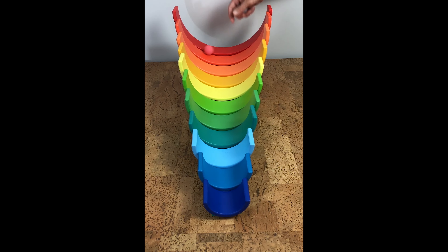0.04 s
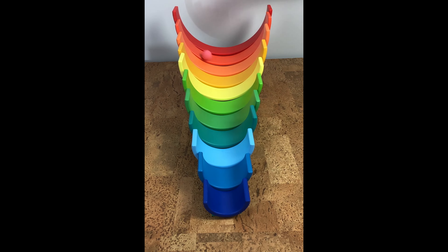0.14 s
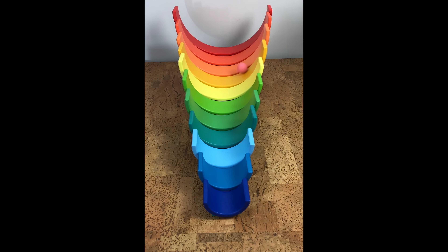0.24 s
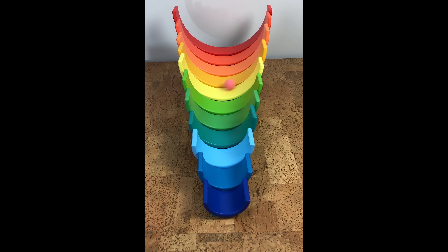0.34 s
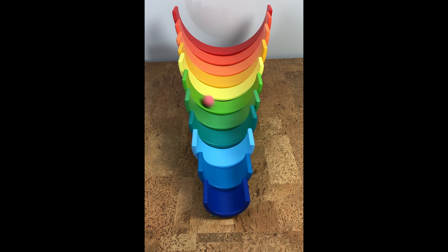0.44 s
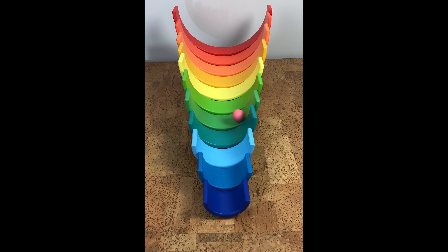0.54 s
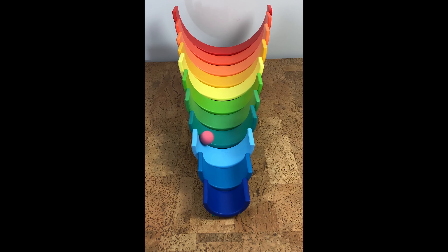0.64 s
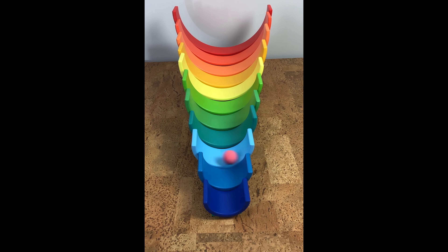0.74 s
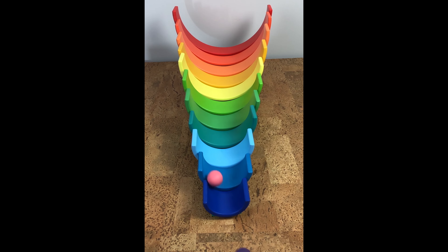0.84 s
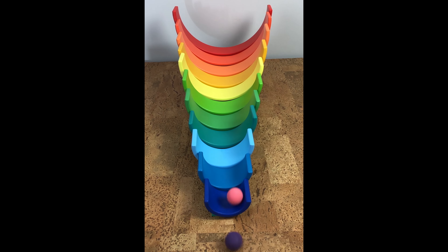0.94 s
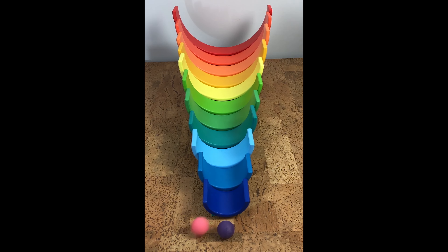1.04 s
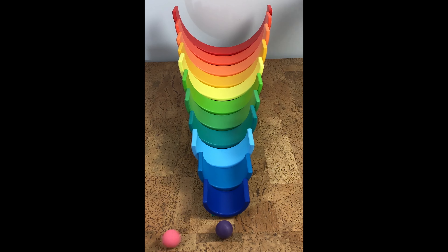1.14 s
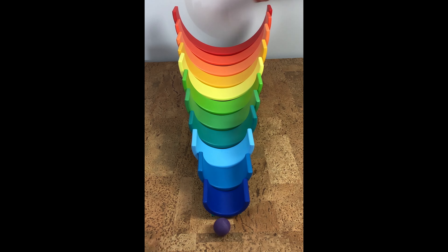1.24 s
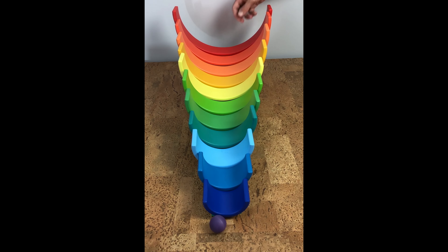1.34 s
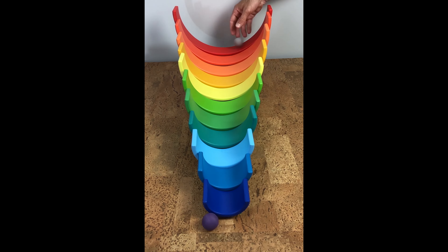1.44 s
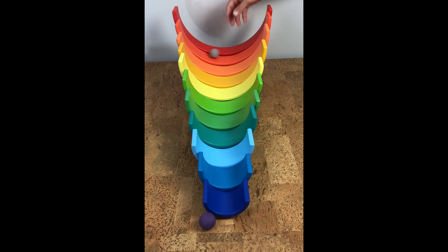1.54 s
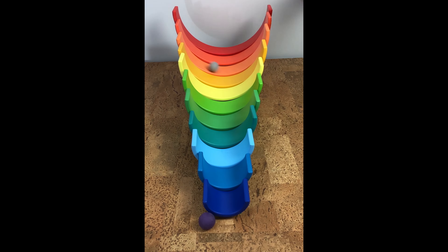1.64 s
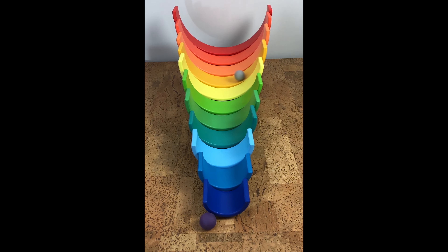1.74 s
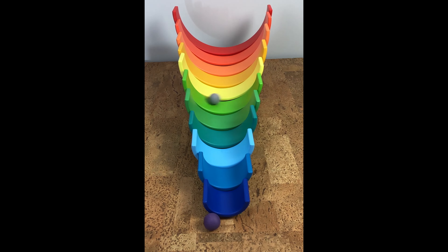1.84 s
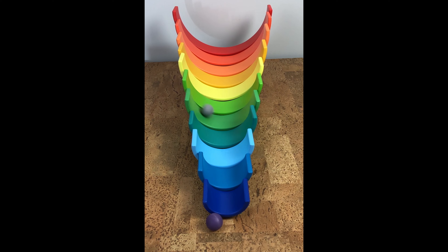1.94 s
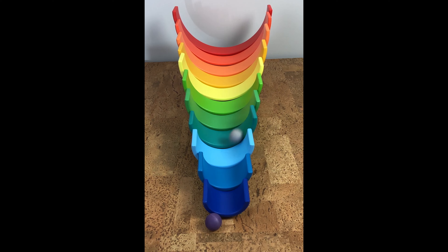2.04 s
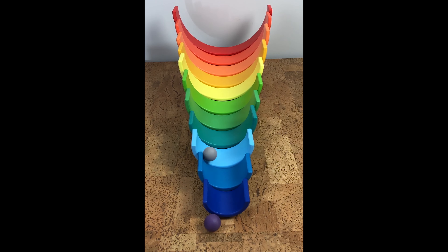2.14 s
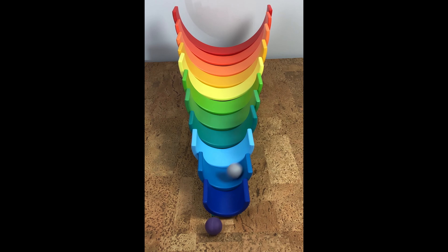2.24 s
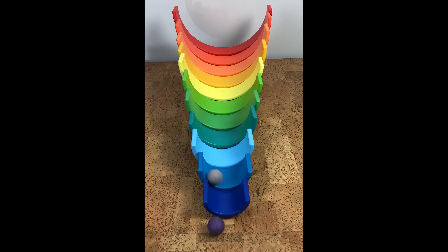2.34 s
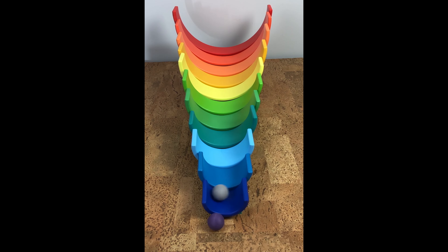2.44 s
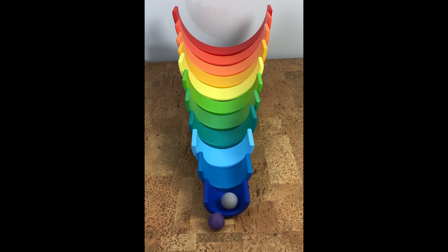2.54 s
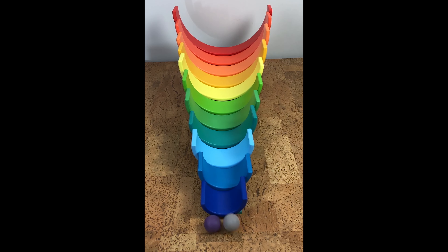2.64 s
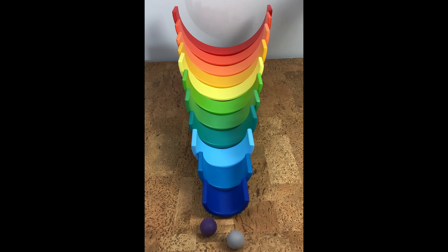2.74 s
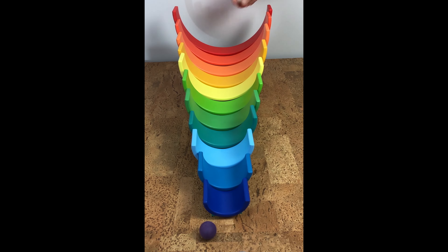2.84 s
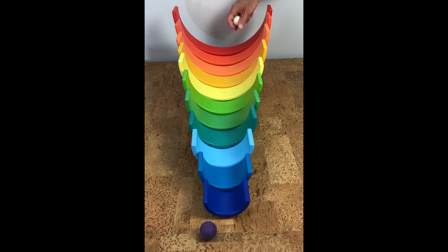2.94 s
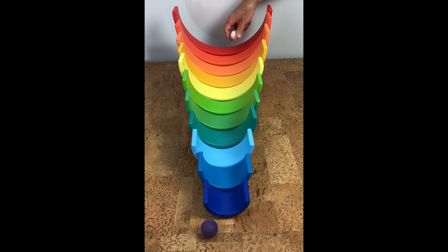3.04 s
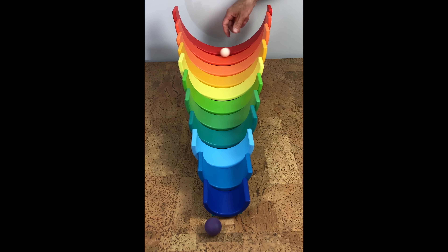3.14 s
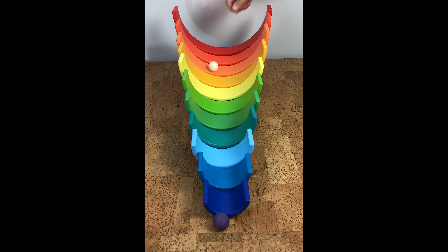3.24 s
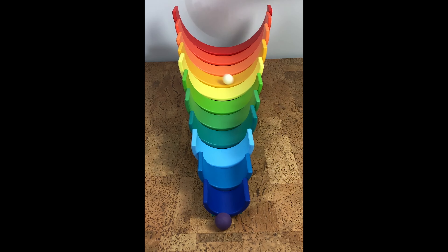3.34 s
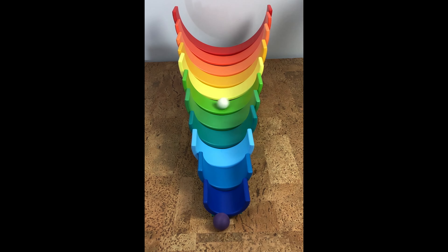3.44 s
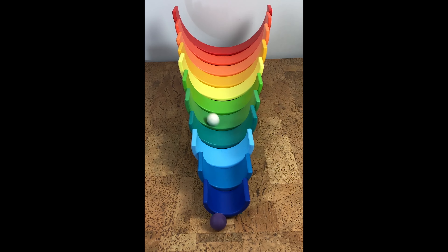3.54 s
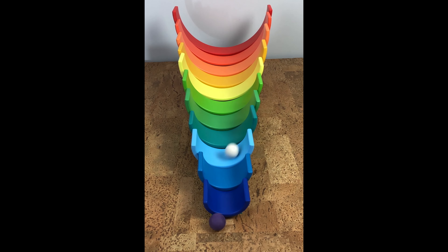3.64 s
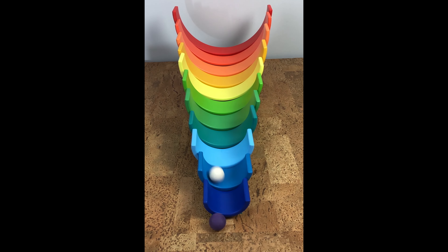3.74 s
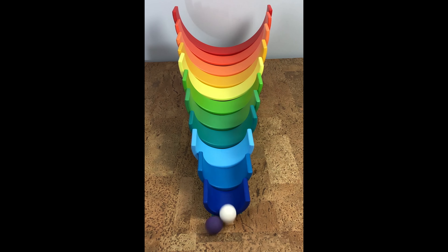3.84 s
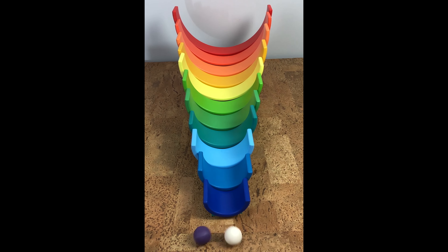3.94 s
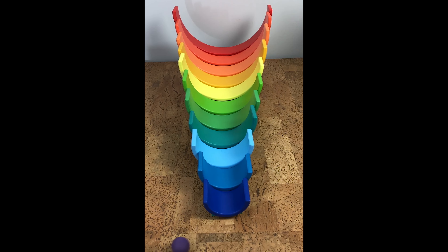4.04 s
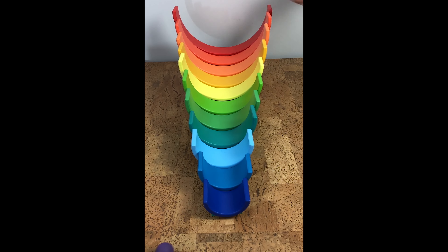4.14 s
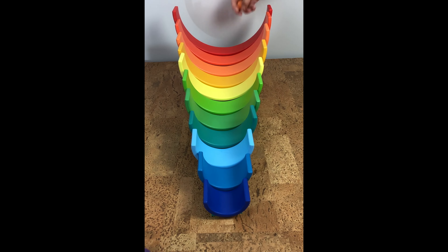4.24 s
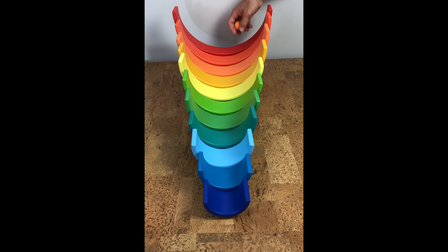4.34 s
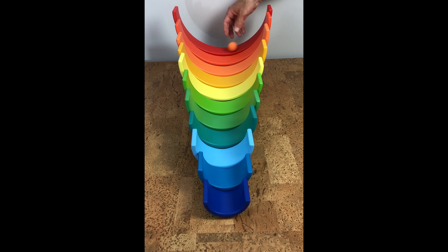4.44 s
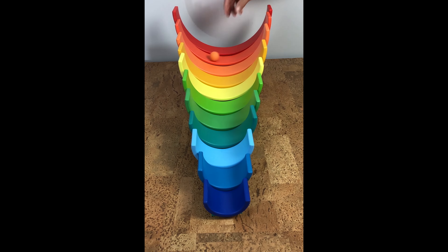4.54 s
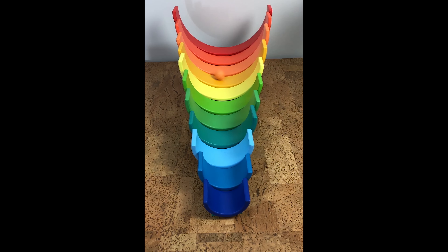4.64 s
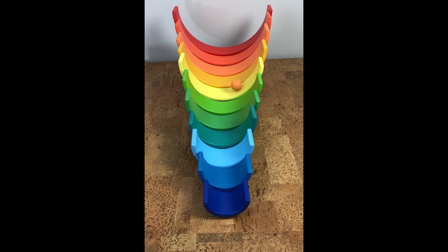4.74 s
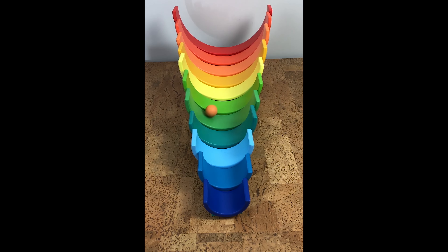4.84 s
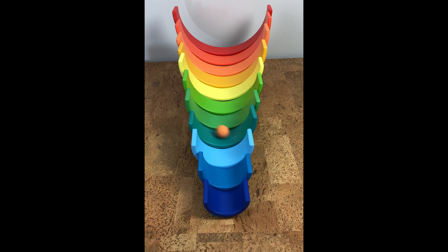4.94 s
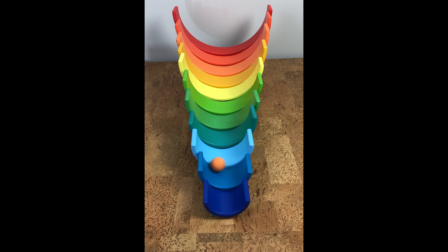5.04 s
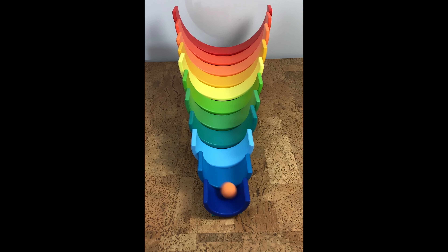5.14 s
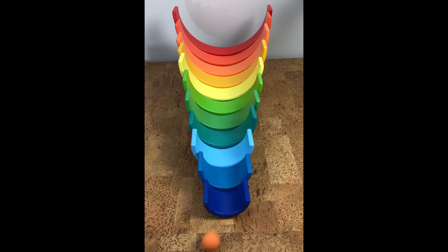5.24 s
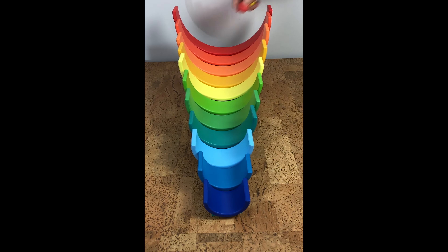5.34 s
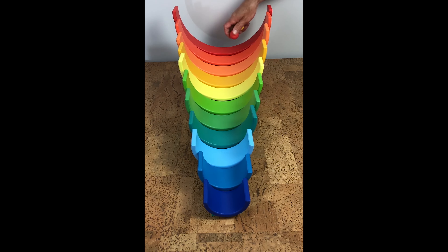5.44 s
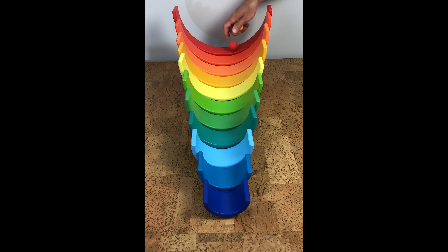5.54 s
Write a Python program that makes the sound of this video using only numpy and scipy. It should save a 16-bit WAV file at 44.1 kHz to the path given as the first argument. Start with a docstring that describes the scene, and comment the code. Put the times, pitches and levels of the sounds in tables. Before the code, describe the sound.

Four quick runs of dry wooden knocking, with short near-silent gaps between them, and the first knock of a fifth. The knocks come roughly every seventh of a second or faster, loudest near the top, with a sharp clatter in the second and third runs. Soft low thumps on cork and small ball clicks end the runs. Close, mono, small quiet room.

```python
"""Wooden balls on a staircase of arches

Small wooden balls are let go one after another at the top of a staircase of nested wooden arches. Each knocks
on arch after arch over a bed of rolling; four bounce on cork, the first three also click against another
ball, and the fifth only starts. A blow is a noise cloud of dense resonances plus sine modes; rolling is many
tiny contacts, rumble and air are coloured noise. A quiet, fairly dry room adds a faint decaying tail."""
import sys
import numpy as np
from scipy import signal
from scipy.fft import rfft, irfft, next_fast_len
from scipy.io import wavfile

SR = 44100
rng = np.random.default_rng(int(sys.argv[2]) if len(sys.argv) > 2 else 0)


def bounce(signal):
    """Save signal as a 16-bit WAV file at the path given by the first command-line argument."""
    frames = np.transpose(np.atleast_2d(signal))
    limited = np.clip(frames, -1, 1)
    pcm = np.round(limited * 32767).astype(np.int16)
    wavfile.write(sys.argv[1], SR, pcm)


N = 246519  # samples

# A ball lands on an arch: [t/s, spot (0-12 down the stack, 13 a hard rim, 14 a loose joint),
# strength level/dB, contact hardness level/dB, jolt to the stack level/dB]
ARCH_IMPACTS = [(0.006, 0, -27.5, -22, -4.5), (0.06, 14, -36, -3.5, 8.5), (0.172, 3, -33.5, -2, -2.5),
                (0.259, 4, -37, 0, 2), (0.344, 5, -35, 3, -4.5), (0.417, 6, -35.5, -4, -1),
                (0.505, 7, -32.5, -4.5, -6.5), (0.563, 8, -44, -19, 4), (0.622, 10, -52.5, -22, 1.5),
                (0.671, 9, -38, 1, -1), (0.768, 10, -38.5, 4, 1), (0.859, 11.5, -44, 4.5, -7.5),
                (0.897, 11, -46.5, -0.5, 0.5), (1.394, 0, -26, -11, -3.5), (1.465, 1, -26.5, 8.5, -0.5),
                (1.529, 2, -32, -3, -1.5), (1.618, 3, -35, 3, 1.5), (1.689, 4.5, -30, 10.5, 7),
                (1.703, 8, -34.5, 5.5, 9.5), (1.77, 12, -45.5, -7, 3), (1.807, 14, -25, -8, 5.5),
                (1.858, 4, -30.5, -3, 2), (1.931, 7, -39, -2, 3), (2.011, 8.5, -34, 4.5, 4),
                (2.088, 9.5, -36.5, -5, 3), (2.139, 10, -35.5, 7.5, -5), (2.234, 10.5, -40, -7.5, -2),
                (2.408, 12, -38, 2, -4.5), (2.438, 12, -56, 13, 2), (2.552, 12, -49.5, 7, 8.5),
                (3.101, 1, -29, 8.5, 2.5), (3.129, 1, -39, 4, 4), (3.152, 2, -32, -1.5, -2.5),
                (3.231, 3, -33.5, -1.5, 1.5), (3.305, 4, -37, -5.5, 6), (3.373, 5, -32, -0.5, -4),
                (3.445, 6, -30, -8.5, -2), (3.462, 5, -36.5, -11.5, 0.5), (3.503, 6.5, -39.5, -7, -4.5),
                (3.515, 13, -32, 22.5, 12.5), (3.525, 13.5, -34.5, 21, 15), (3.576, 8, -32, 6.5, 5),
                (3.641, 9, -34, 3, -1), (3.713, 10, -34, 3.5, 5), (3.79, 11.5, -29, 6, 2.5),
                (4.444, 1, -29.5, 11, 0), (4.509, 2, -33, -10, -4.5), (4.585, 3, -30.5, 0.5, -2),
                (4.66, 4, -35.5, -5.5, 5), (4.73, 5, -34.5, 1, -1), (4.799, 6, -32, -8.5, 0.5),
                (4.814, 6, -35.5, -8.5, -5), (4.867, 7, -30.5, 1, -1), (4.935, 8, -31.5, -2.5, -2.5),
                (5.001, 9, -37.5, 3.5, -4), (5.075, 10.5, -27, 1, -2), (5.151, 11.5, -30, 5, 0.5),
                (5.533, 1, -29.5, 7, 0)]
# Modes of the wood at each spot: [spot, f/Hz, relative level/dB, t60/s]
ARCH_MODES = [(0, 1378, -6, 0.12), (0, 1776, -9, 0.1), (0, 2271, -10, 0.12), (0, 2767, -11, 0.07),
              (1, 1555, -16, 0.18), (1, 2083, -17, 0.12), (1, 2643, -15, 0.1), (1, 2836, -7, 0.07),
              (1, 3289, -15, 0.08), (1, 4317, -13, 0.07), (2, 834, -13, 0.18), (2, 1248, -9, 0.14),
              (2, 1674, -13, 0.06), (2, 1851, -13, 0.08), (2, 1970, -16, 0.07), (2, 2379, -13, 0.1),
              (3, 915, -15, 0.18), (3, 1437, -13, 0.07), (3, 2314, -11, 0.09), (3, 4242, -17, 0.06),
              (4, 177, -14, 0.18), (4, 1281, -12, 0.09), (4, 2520, -9, 0.07), (4, 3560, -19, 0.06),
              (5, 1318, -12, 0.07), (5, 1426, -11, 0.16), (5, 2820, -9, 0.07), (6, 1038, -17, 0.16),
              (6, 1738, -5, 0.11), (7, 1426, -9, 0.13), (7, 1884, -14, 0.07), (7, 2282, -15, 0.14),
              (7, 3870, -16, 0.06), (8, 952, -17, 0.16), (8, 1846, -13, 0.14), (8, 2293, -15, 0.06),
              (8, 2772, -11, 0.06), (8, 3671, -13, 0.07), (9, 1200, -11, 0.09), (9, 1641, -16, 0.11),
              (9, 2470, -6, 0.08), (9, 3488, -16, 0.06), (10, 866, -11, 0.11), (10, 1590, -10, 0.06),
              (10, 1964, -13, 0.08), (11, 1022, -16, 0.18), (11, 1340, -12, 0.16), (11, 1900, -10, 0.09),
              (11, 2277, -13, 0.1), (12, 1415, -5, 0.09), (12, 1900, -14, 0.08), (12, 5512, -15, 0.06),
              (13, 1400, -8, 0.08), (13, 6018, -14, 0.07), (13, 6336, -12, 0.08), (13, 6454, -11, 0.08),
              (13, 6870, -16, 0.07), (13, 7321, -14, 0.08), (14, 770, -10, 0.1), (14, 1324, -5, 0.075),
              (14, 1604, -9, 0.078)]
# Preference of each spot for the clack register, indexed by spot: [level/dB]
SPOT_CLACK_DB = [3, 3.5, -0.5, 1.5, 2.5, 3.5, -2.5, -3, 2, 2.5, -2, -4, -6, -4.5, -4]
# Dense, overlapping resonances of struck wood: [f/Hz, level/dB]
WOOD_SPECTRUM = [(35, -39), (105, -11), (170, -6), (250, -2), (400, -3), (520, -5.5), (750, -2),
                 (1500, -0.5), (2800, -1), (4500, -4), (6500, -7), (10000, -17), (15000, -26)]
# A ball bounces on the cork: [t/s, strength level/dB, hardness level/dB, jolt to the surface level/dB]
CORK_IMPACTS = [(1.045, -32, -3.5, -9), (1.078, -37.5, 2.5, -4.5), (1.106, -44, -8, 3),
                (1.183, -51.5, 0.5, -3), (2.661, -36.5, 2.5, -3), (2.7, -43, 4, 2), (3.888, -39, 1, -1),
                (3.92, -44, 3.5, 2.5), (3.949, -50.5, -4, 1.5), (5.231, -37, 3, -2), (5.264, -39, -7, -8),
                (5.282, -41, -11, 0.5)]
# Modes of the surface under the cork: [f/Hz, relative level/dB, t60/s]
CORK_MODES = [(386, -14.5, .08), (807, -14, 0.052)]
# Dense, overlapping resonances of the cork surface: [f/Hz, level/dB]
CORK_SPECTRUM = [(30, -48.5), (70, -24), (246, -4.5), (938, -3.5), (1520, -7.5), (2260, -15.5), (4000, -25),
                 (5600, -23.5), (8000, -37), (15000, -44)]
# The ball clicks against one that lies at the foot: [t/s, strength level/dB]
BALL_CLICKS = [(1.015, -46.5), (2.517, -61.5), (2.627, -57), (3.849, -39.5)]
# Short, hollow spectrum of ball on ball: [f/Hz, level/dB]
CLICK_SPECTRUM = [(60, -29), (400, -14), (1500, -8), (2800, 2.5), (4400, -3.5), (6000, -21), (15000, -25)]
# Light touches along the lowest rim: [t/s, strength level/dB, hardness level/dB, ring f/Hz]
RIM_TOUCHES = [(2.459, -55, -3, 5700), (2.639, -47, -4.5, 6000), (2.703, -56, 0, 5761),
               (2.743, -53, -8.5, 5600), (2.783, -57.5, -1.5, 5470), (2.811, -59.5, -6, 5230),
               (2.84, -60, -3, 5400)]
# Broad resonances of a light touch: [f/Hz, level/dB]
TOUCH_SPECTRUM = [(40, -39), (200, -8), (1900, 15), (2600, 6), (3500, -4.5), (4700, -1), (5800, 3),
                  (7000, -15), (15000, -27)]
# Each ball's run down the stack: [start t/s, reaches the cork t/s, rolling level/dB, rumble level/dB,
# fine rattle level/dB at the end of the run]
RUNS = [(0, 0.94, -57, -59, -65.5), (1.4, 2.304, -52, -61, -67.5), (3.099, 3.81, -51, -64, -67.5),
        (4.44, 5.256, -55, -57.5, -73), (5.53, 5.8, -50, -55, -70)]
# Rolling grain of the wood: [f/Hz, level/dB]
GRAIN_SPECTRUM = [(150, -16), (450, -0.5), (900, 10.5), (1500, 6.5), (2400, -6), (4000, -26), (6000, -18.5),
                  (15000, -37.5)]
# Fine rattle of the ball skipping over the grain: [f/Hz, level/dB]
RATTLE_SPECTRUM = [(300, -29.5), (1500, -5.5), (2800, -2.5), (5500, -0.5), (8000, -14.5), (15000, -19)]
# Low rumble of the stack: [f/Hz, level/dB]
RUMBLE_SPECTRUM = [(30, -41), (70, -8), (105, -7.5), (140, -2.5), (190, -3.5), (250, 3.5), (380, -4.5),
                   (600, -10), (1500, -52)]
# Room air: [f/Hz, level/dB]
AIR_SPECTRUM = [(25, -8.5), (60, -0.5), (260, -0.5), (450, -15), (1000, -16.5), (3000, -25), (15000, -34)]
# Edges of the thud, knock, clack and tick registers: [f/Hz]
REGISTER_EDGES_HZ = [90, 600, 2400, 5200, 15000]
# Small pieces radiate little deep bass: [f/Hz, level/dB]
BASS_LOSS = [(30, -14), (70, -3.5), (130, 0)]
# Balance of a contact on wood, cork, ball and rim: [thud, knock, clack, tick level/dB]
ON_WOOD_DB = [-15, 0, -4.5, -16]
ON_CORK_DB = [-2, -1, -19, -25]
ON_BALL_DB = [-4, -3, -3, -23]
ON_RIM_DB = [-10, 2, -7, -2]

KNOCK_TIME = np.arange(16384) / SR - .03  # s, zero at the peak of a knock
KNOCK_SPAN_S = .02  # register levels are energy spread over this time
TOP_HZ = 15850
CLACK_SHARE = 0.51  # share of the hardness level that reaches the clack register
CLATTER_PER_JOLT = .35  # dB of clatter per dB of jolt
NEIGHBOUR_DB, NEIGHBOUR_T60_S = -20, .2
TOUCH_RING_DB, TOUCH_RING_T60_S = -14.5, 0.045
ROLL_ATTACK_S, ROLL_RELEASE_S, RATTLE_RELEASE_S = 0.067, 0.074, 0.035
RATTLE_GROWTH_DB_PER_S = 17
RUMBLE_ATTACK_S, RUMBLE_HOLD_S, RUMBLE_RELEASE_S = 0.023, 0.14, 0.3
AIR_DB = -66


def arches():
    """Modal excitation: each blow rings the struck arch, and coupling lets its neighbours ring along."""
    out = np.zeros(N)
    for s, position, strength_db, hardness_db, jolt_db in ARCH_IMPACTS:
        spot = round(position)
        modes = []
        for at, hz, db, t60 in ARCH_MODES:
            if at == spot:
                modes.append((hz, db, t60))
            elif abs(at - spot) == 1 and max(at, spot) < 13:
                modes.append((hz, db + NEIGHBOUR_DB, NEIGHBOUR_T60_S))
        # a heavy jolt shakes the whole stack, whose clatter covers the arch's own notes
        body_db = -4.5 + CLATTER_PER_JOLT * jolt_db
        levels_db = contact(ON_WOOD_DB, strength_db, hardness_db, jolt_db, SPOT_CLACK_DB[spot])
        blow = knock(WOOD_SPECTRUM, modes, levels_db, rise_s=0.0075, crack_t60=0.045,
                     tail_db=-6, tail_t60=0.2, body_db=body_db)
        add(out, s, blow)
    return out


def cork_bounces():
    """Soft impact: the ball bounces dully, since a yielding surface excites little treble."""
    out = np.zeros(N)
    for s, strength_db, hardness_db, jolt_db in CORK_IMPACTS:
        levels_db = contact(ON_CORK_DB, strength_db, hardness_db, jolt_db)
        blow = knock(CORK_SPECTRUM, CORK_MODES, levels_db, rise_s=0.0063, crack_t60=0.05,
                     tail_db=-3.0, tail_t60=0.12, body_db=0.5)
        add(out, s, blow)
    return out


def ball_clicks():
    """Collision of two small solids: a short, hollow click without separate modes."""
    out = np.zeros(N)
    for s, strength_db in BALL_CLICKS:
        blow = knock(CLICK_SPECTRUM, [], contact(ON_BALL_DB, strength_db), rise_s=.007, crack_t60=0.045,
                     tail_db=-11, tail_t60=0.16, body_db=0)
        add(out, s, blow)
    return out


def rim_touches():
    """Light contact excitation: the ball rattles along the lowest rim, each touch with one high mode."""
    out = np.zeros(N)
    for s, strength_db, hardness_db, hz in RIM_TOUCHES:
        modes = [(hz, TOUCH_RING_DB, TOUCH_RING_T60_S)]
        levels_db = contact(ON_RIM_DB, strength_db, hardness_db)
        blow = knock(TOUCH_SPECTRUM, modes, levels_db, rise_s=0.0055, crack_t60=0.051,
                     tail_db=-4, tail_t60=0.32, body_db=0.5)
        add(out, s, blow)
    return out


def soft_bump():
    """Damped oscillation: two decaying low sines make one soft bump as a ball rolls away."""
    out = np.zeros(N)
    low = np.sin(2 * np.pi * 62 * KNOCK_TIME) * swell(0.01, 0.09)
    upper = np.sin(2 * np.pi * 248 * KNOCK_TIME) * swell(0.0055, 0.086)
    add(out, 2.876, undb(-52.5) * (low + upper))
    return out


def rolling():
    """Rolling as a series of micro-impacts: the ball stumbles and skips over the grain of the wood."""
    t = np.arange(N) / SR
    roll, rattle = np.zeros((2, N))
    for start, end, roll_db, _, rattle_db in RUNS:
        roll += undb(roll_db) * gate(start, end, ROLL_ATTACK_S, ROLL_RELEASE_S)
        # the rattle grows as the ball nears the lowest arch
        growth_db = -RATTLE_GROWTH_DB_PER_S * np.maximum(end - t, 0)
        rattle += undb(rattle_db + growth_db) * gate(start, end, ROLL_ATTACK_S, RATTLE_RELEASE_S)
    contacts = np.zeros(N)
    for at in np.linspace(0, N / SR, 300):
        tap = unit(ring(spacing_hz=130, depth_db=5) * swell(.006, .12))
        add(contacts, at + KNOCK_SPAN_S * rng.random(), undb(rng.uniform(-11, 0)) * tap)
    grain = colour(contacts, GRAIN_SPECTRUM)
    fine = colour(contacts, RATTLE_SPECTRUM)
    return roll * grain / grain.std() + rattle * fine / fine.std()


def stack_rumble():
    """Structure-borne sound: wavering low noise under each run, held on while the ball crosses the cork."""
    level = np.zeros(N)
    for start, end, _, rumble_db, _ in RUNS:
        level += undb(rumble_db) * gate(start, end + RUMBLE_HOLD_S, RUMBLE_ATTACK_S, RUMBLE_RELEASE_S)
    return level * noise(RUMBLE_SPECTRUM) * undb(0.9 * walk(25, size=N))


def room(x, t60, gain_db):
    """Reverberation: convolution with exponentially decaying noise gives a faint, dull tail from the walls."""
    t = np.arange(SR // 2) / SR
    decay = np.exp(-np.log(1000) * t / t60)
    tail = rng.standard_normal(len(t)) * decay * np.minimum(t / 0.011, 1)
    tail = colour(unit(tail), [(50, 17.0), (200, 22.5), (1500, 2.5), (6000, -6), (14000, -9.5)])
    return undb(gain_db) * signal.fftconvolve(x, tail)[:N]


def room_air():
    """Stationary background noise: a faint, mostly low, steady hush."""
    return undb(AIR_DB) * noise(AIR_SPECTRUM)


def knock(body, modes, levels_db, rise_s, crack_t60, tail_db, tail_t60, body_db):
    """Impact response: a crack, a duller tail of the same resonances, and the clear modes of the piece."""
    size = len(KNOCK_TIME)
    cloud = ring(spacing_hz=130, depth_db=3.4)
    crack = cloud * swell(rise_s, crack_t60)
    # treble is lost first in the tail
    tail = colour(cloud * swell(rise_s, tail_t60), [(300, 2.0), (1500, 5.0), (10000, -9.0)])
    dense = unit(crack) + undb(tail_db) * unit(tail)
    x = undb(body_db) * unit(colour(dense, body))
    for hz, db, t60 in modes:
        # the loose pieces shift against each other, so each mode wavers, the deep ones least
        waver = .16 * min(hz / 1000, 1) * walk(85, size=size)
        cycles = hz * KNOCK_TIME + rng.random() + waver
        x = x + undb(db) * unit(np.sin(2 * np.pi * cycles) * swell(rise_s, t60))
    return colour(weigh(x, np.array(levels_db)), BASS_LOSS)


def contact(balance_db, strength_db, hardness_db=0, jolt_db=0, clack_db=0):
    """Contact mechanics: strength lifts all registers, hardness the treble, a jolt the thud."""
    lift_db = np.array([jolt_db, 0, CLACK_SHARE * hardness_db + clack_db, hardness_db])
    return np.array(balance_db) + strength_db + lift_db


def weigh(x, levels_db):
    """Spectral energy distribution: speed and hardness of a contact set the energy in each register."""
    edges = np.array(REGISTER_EDGES_HZ)
    centres = np.r_[np.sqrt(edges[1:] * edges[:-1]), TOP_HZ]
    bins = (edges * len(x) / SR).astype(int)
    for _ in range(2):  # the second pass corrects for the overlap of the registers
        power = np.abs(rfft(x)) ** 2
        energy = np.diff(np.cumsum(power)[bins]) * 2 / len(x)
        gain_db = levels_db - 10 * np.log10(energy / (KNOCK_SPAN_S * SR))
        # the slope between the upper two registers continues towards the top
        top_db = gain_db[-1] + (gain_db[-1] - gain_db[-2]) / 2
        x = colour(x, np.c_[centres, np.r_[gain_db, top_db]])
    return x


def ring(spacing_hz, depth_db):
    """Modal overlap: a cloud of broad resonances as noise with chance spectral humps, spacing_hz apart."""
    size = len(KNOCK_TIME)
    f = np.fft.rfftfreq(size, 1 / SR)
    humps = np.arange(0, SR / 2, spacing_hz)
    height_db = depth_db * np.clip(rng.standard_normal(len(humps)), -2, 2)
    spectrum = rfft(rng.standard_normal(size))
    return unit(irfft(spectrum * undb(np.interp(f, humps, height_db))))


def swell(rise_s, t60):
    """Damping: an envelope that builds over a few milliseconds, rounds off and decays exponentially."""
    t = KNOCK_TIME
    age = np.hypot(np.maximum(t, 0), rise_s / 2) - rise_s / 2
    return np.exp(-(np.minimum(t, 0) / rise_s) ** 2 - np.log(1000) * age / t60)


def gate(start, end, attack_s, release_s):
    """Sustained excitation: an envelope that rises at start, holds until end and decays exponentially."""
    t = np.arange(N) / SR
    return np.clip((t - start) / attack_s, 0, 1) * np.exp(-np.maximum(t - end, 0) / release_s)


def walk(rate, size):
    """Random modulation: a wander joined from rate chance values per second, with a spread of nearly two."""
    knots = rng.standard_normal(size // 16)
    return 2.22 * np.interp(np.arange(size) * rate / SR, np.arange(len(knots)), knots)


def noise(points):
    """Filtered white noise: a coloured random signal with an rms of one."""
    x = colour(rng.standard_normal(next_fast_len(N)), points)[:N]
    return x / x.std()


def colour(x, points):
    """Linear filtering: the spectrum is scaled by (f/Hz, level/dB) points joined on a log-frequency axis."""
    hz, db = np.transpose(points)
    f = np.fft.rfftfreq(len(x), 1 / SR)
    gain_db = np.interp(np.log(f + 1), np.log(hz), db)
    return irfft(rfft(x) * undb(gain_db), len(x))


def unit(x):
    """Energy normalisation: scale to an energy of one."""
    return x / np.sqrt(np.sum(x ** 2))


def undb(db):
    """Logarithmic level: decibels to amplitude gain."""
    return 10 ** (np.asarray(db) / 20)


def add(out, s, x):
    """Superposition: mix in a knock so that the zero of KNOCK_TIME falls at time s."""
    start = int((s + KNOCK_TIME[0]) * SR)
    a, b = max(start, 0), min(start + len(x), N)
    out[a:b] += x[a - start:b - start]


def scene():
    """Superposition of direct sound, reverberation and room air."""
    impacts = arches() + cork_bounces() + ball_clicks() + rim_touches() + soft_bump()
    direct = impacts + rolling() + stack_rumble()
    return (direct + room(direct, t60=0.11, gain_db=-23.5) + room_air())[None]


def record(dry):
    """Band limitation: a steep elliptic low-pass cuts the top of the treble."""
    return signal.sosfilt(signal.ellip(10, .2, 80, TOP_HZ, fs=SR, output="sos"), dry)


dry = scene()
out = record(dry)
bounce(out)
```